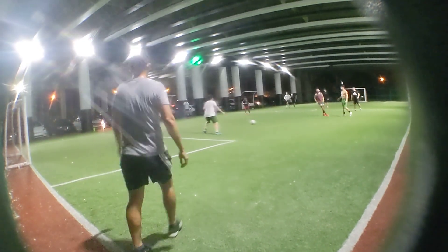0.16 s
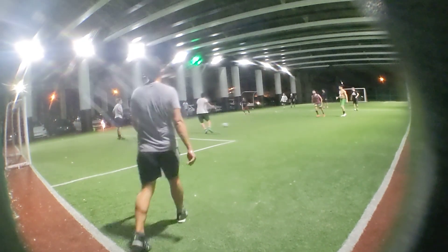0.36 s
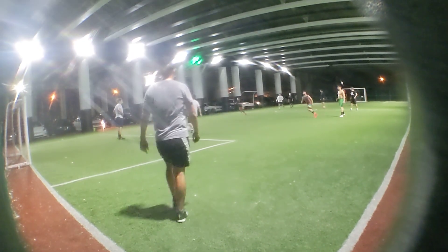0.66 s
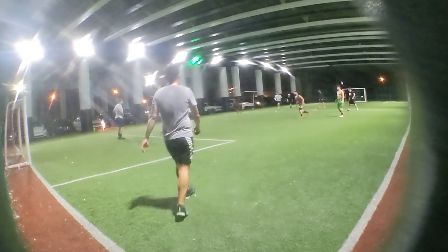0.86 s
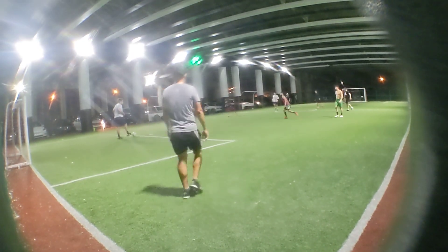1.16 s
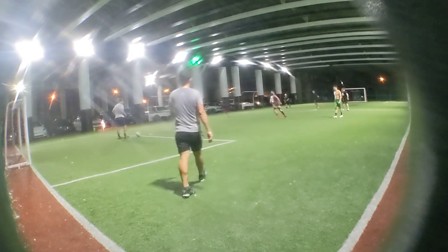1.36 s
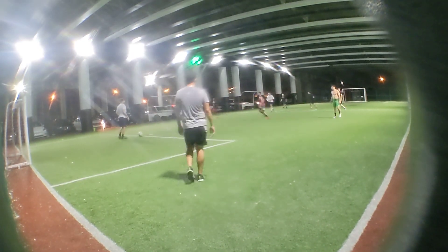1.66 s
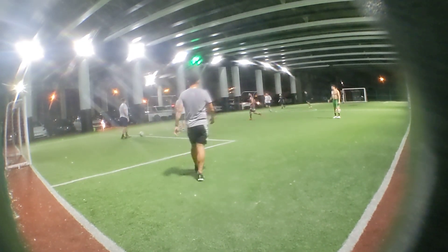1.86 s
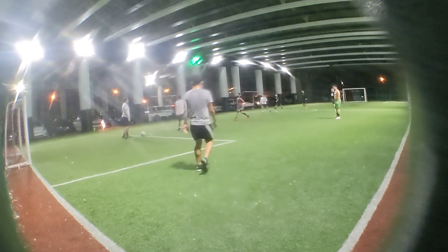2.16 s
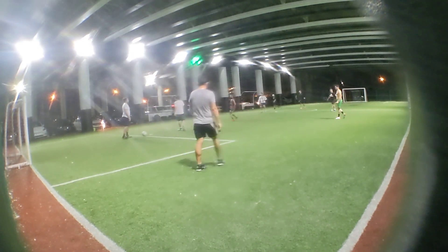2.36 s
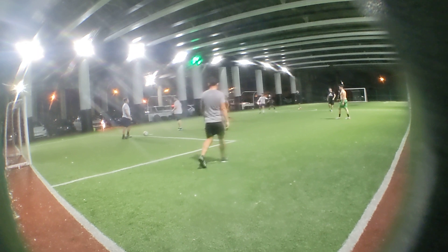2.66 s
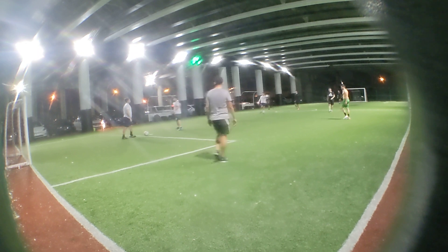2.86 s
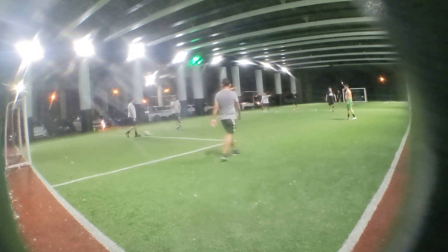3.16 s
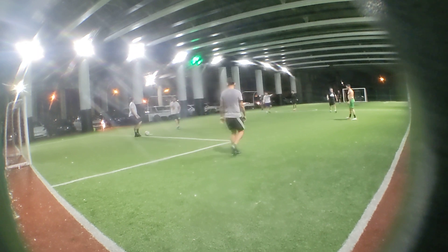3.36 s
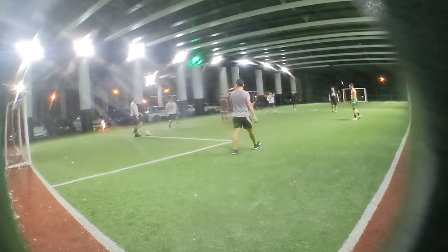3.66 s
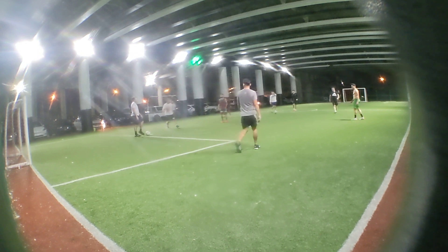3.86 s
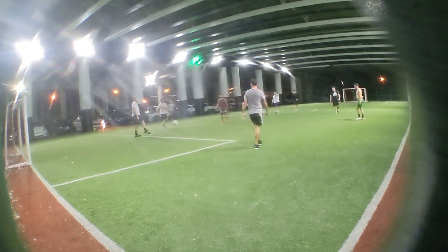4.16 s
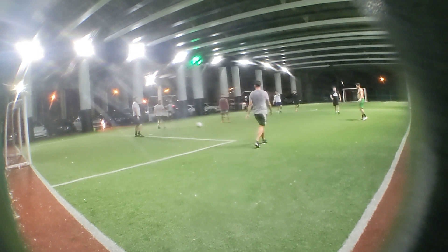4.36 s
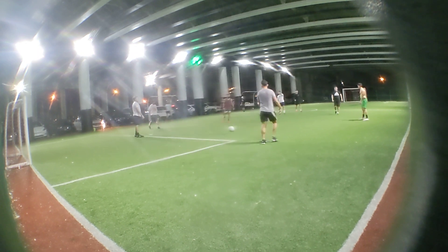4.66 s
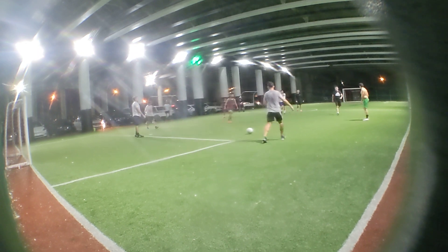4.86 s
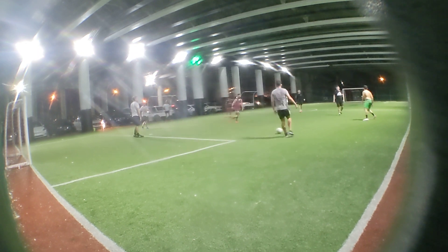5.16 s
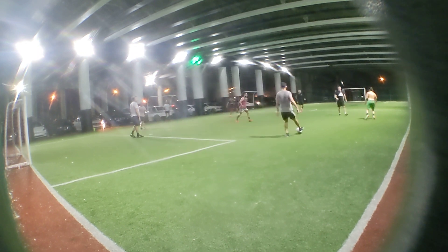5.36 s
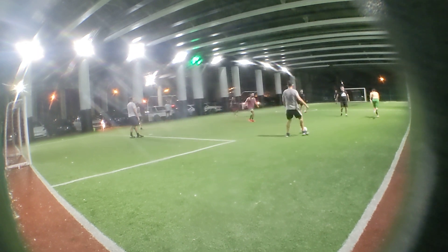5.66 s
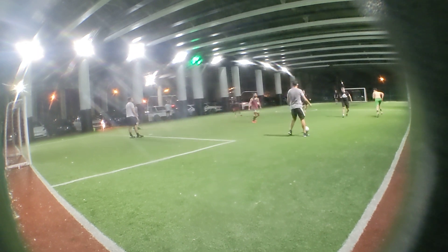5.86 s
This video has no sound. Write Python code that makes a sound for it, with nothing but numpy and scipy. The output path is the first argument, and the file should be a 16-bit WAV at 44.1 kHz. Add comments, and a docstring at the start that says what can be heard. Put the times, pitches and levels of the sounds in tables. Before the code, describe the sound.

Wide, low, boomy traffic noise from a bridge deck overhead, with a lumpy low engine drone that surges and fades. Close to a small stereo camera microphone, one rough rubbery scrape, then a few quiet grassy scuffs and crisp little clicks. Two near-joined distant thuds and later another single one sound dully. The rumble swells mid-way, then eases as faint car tyres hiss past.

```python
"""Traffic rumbles through the deck of a road viaduct, over a covered football pitch at night.
The place is heard by a small camera with two microphone ports, beside the goal. The rumble is shaped noise that
swells once as a vehicle crosses; a lighter car follows, heard only by its tyres. Engine notes are drifting tones
blurred by random echoes, and far knocks are short booms. Close by, a sole scrapes as ringing noise,
shoes scuff the turf as grainy noise, and small sharp ticks strike treble resonances."""
import sys
import numpy as np
from scipy import signal
from scipy.fft import rfft, irfft, next_fast_len
from scipy.io import wavfile
from scipy.ndimage import uniform_filter1d, map_coordinates

SR = 44100
rng = np.random.default_rng(int(sys.argv[2]) if len(sys.argv) > 2 else 0)


def dump_mix(stems):
    """Bounce the given channels to the path in sys.argv[1] as a 16-bit WAV at rate SR."""
    frames = np.atleast_2d(stems).T  # one column per channel
    limited = np.clip(frames, -1, 1)  # hard clip at full scale
    pcm = np.round(limited * 32767).astype(np.int16)
    wavfile.write(sys.argv[1], SR, pcm)


N = 265032  # length in samples
TOP_HZ = 15760  # the camera's band limit


def amp(db):
    """Decibels to gain."""
    return 10 ** (np.asarray(db) / 20)


def unit(x):
    """Scale to rms 1."""
    return x / np.sqrt(np.mean(x ** 2) + 1e-20)


def along(points, hz):
    """Read a curve of (Hz, value) points on a log frequency axis."""
    point_hz, values = np.transpose(points)
    return np.interp(np.log(hz + 1), np.log(point_hz + 1), values)


def clock():
    """The time of every sample in seconds."""
    return np.arange(N) / SR


def wobble(rate):
    """A smooth random curve with this many knots a second."""
    knots = rng.standard_normal(int(N * rate / SR) + 4)
    return map_coordinates(knots, [clock() * rate])


def swell(s, half):
    """A bell-shaped rise and fall around time s."""
    return np.exp(-.5 * ((clock() - s) / half) ** 2)


def filtered(x, response):
    """Multiply the spectrum of x by a response of frequency."""
    m = next_fast_len(N + 8192)
    spectrum = rfft(x, m) * response(np.fft.rfftfreq(m, 1 / SR))
    return irfft(spectrum, m)[..., :N]


def panned(pan_db):
    """Left and right gains for a left-minus-right level difference."""
    return amp([[pan_db / 2], [-pan_db / 2]])


def diffuse(spectrum, patchy_db):
    """Stereo noise of rms 1 arriving from all sides, with patches of random gain."""
    # How alike the two ports hear; long waves reach both alike.
    # Each row: frequency in Hz, left-right likeness (1 is identical, negative is opposed).
    alike = [(60, 0.96), (83, 0.95), (110, 0.97), (160, 0.97), (220, 0.94), (300, 0.91), (420, 0.62),
             (580, 0.63), (810, 0.21), (1120, -0.016), (1540, -0.28), (2140, -0.024), (2960, 0.02),
             (4090, -0.16), (5660, 0.0012), (7830, -0.092), (10800, -0.05), (15000, -0.04)]
    noise = signal.stft(rng.standard_normal((2, N)), nperseg=1024)[2]
    field = rng.standard_normal(noise.shape[1:])
    field = uniform_filter1d(field, size=8, axis=0)  # smooth over frequency
    field = uniform_filter1d(field, size=12, axis=1)  # smooth over time
    pair = signal.istft(noise * amp(patchy_db * unit(field)), nperseg=1024)[1][:, :N]

    def mid_side(hz):
        turn = np.arccos(np.clip(along(alike, hz), -1, 1)) / 2
        return amp(along(spectrum, hz)) * [np.cos(turn), np.sin(turn)]

    mid, side = filtered(pair, mid_side)
    return unit(np.array([mid + side, mid - side]))


def hum(hz, drift_hz, echo_db):
    """A drifting tone plus its many reflections, which beat with it in uneven lumps."""
    phase = 2 * np.pi * np.cumsum(hz + drift_hz * wobble(14)) / SR
    echoes = unit(wobble(19)) * np.sin(phase) + unit(wobble(23)) * np.cos(phase)
    return unit(np.sin(phase) + amp(echo_db) * echoes / np.sqrt(2))


def ringing(modes, stroke):
    """Rough contact as noise bands at the resonances (Hz, width Hz, dB), following the stroke's strength."""
    out = np.zeros((2, len(stroke)))
    for hz, width, db in modes:
        mode = signal.butter(2, [hz - width / 2, hz + width / 2], "bandpass", fs=SR, output="sos")
        # reversed, so the filter's quiet start falls at the end
        band = signal.sosfilt(mode, rng.standard_normal(out.shape))[:, ::-1]
        out += amp(db) * np.array([unit(stroke * port) for port in band])
    return unit(out) * np.sqrt(np.mean(stroke ** 2))


def distance_db(lag):
    """Level of the crossing vehicle against its closest moment: it falls as one over the distance."""
    closest_s, distance_m, speed_m_per_s = 2.39, 18.7, 16.8
    along_road = speed_m_per_s * (clock() - closest_s - lag)
    return 20 * np.log10(distance_m / np.hypot(distance_m, along_road))


def traffic():
    """The deck rumbles; bodies, tyre roar and hiss lie above it as diffuse noise, and all swell with the crossing."""
    # Spectra of the four layers. Each row: frequency in Hz, relative level in dB per Hz.
    deck_spectrum = [(12, -42.5), (30, -28), (48, -8.5), (65, -1), (90, -1.5), (122, 3), (150, -1.5),
                     (200, -11.5), (400, -48), (900, -120)]
    body_spectrum = [(40, -84), (100, -18), (150, -2.5), (185, 1), (225, -3.5), (255, -5.5), (305, -6),
                     (345, -10.5), (420, -17), (600, -27.5), (2500, -120)]
    tyre_spectrum = [(100, -69), (250, -21.5), (450, 2.5), (520, -1), (610, 1), (730, -3), (900, -2),
                     (1100, -7), (1500, -10), (2000, -15), (3000, -30.5), (9000, -100)]
    hiss_spectrum = [(300, -69), (900, -22), (1650, -3.5), (2550, 0), (3000, -4.5), (4000, -9.5),
                     (5500, -14), (7200, -17.5), (9000, -21.5), (10800, -28), (12000, -27.5), (13500, -31),
                     (15700, -30.5)]
    # level in dB at the closest moment, share of the distance loss that the layer follows
    deck_db, deck_follows = -23.5, 0.32
    body_db, body_follows = -22, 0.7
    # off the span; the hiss also follows distance, late because tyres throw it backwards
    tyre_db, tyre_span_db = -34, 3
    hiss_db, hiss_span_db, hiss_follows, hiss_lag_s = -45.5, 0.8, 0.054, 0.72
    span_on_s, span_off_s, span_ramp_s = 1.42, 3.96, 0.12  # the vehicle is on the span overhead

    def past(s):
        return .5 + .5 * np.tanh((clock() - s) / (2 * span_ramp_s))

    on_span = past(span_on_s) - past(span_off_s)
    deck_level = deck_db + deck_follows * distance_db(0)
    body_level = body_db + body_follows * distance_db(0)
    tyre_level = tyre_db + tyre_span_db * on_span
    hiss_level = hiss_db + hiss_span_db * on_span + hiss_follows * distance_db(hiss_lag_s)
    deck = amp(deck_level) * diffuse(deck_spectrum, patchy_db=0.5)
    body = amp(body_level) * diffuse(body_spectrum, patchy_db=0.26)
    tyres = amp(tyre_level) * diffuse(tyre_spectrum, patchy_db=0.94)
    hiss = amp(hiss_level) * diffuse(hiss_spectrum, patchy_db=0.9)
    return deck + body + tyres + hiss


def car():
    """The following lighter car's tyres swish by as a bell-shaped swell of noise in the middle treble."""
    # The swish's colour. Each row: frequency in Hz, relative level in dB per Hz.
    tyre_colour = [(500, -45), (1000, -12), (1400, 6.5), (2400, 2), (3500, -19.5), (8000, -60.5)]
    passing_s, half_s, peak_db = 4.88, 0.87, -46
    return amp(peak_db) * swell(passing_s, half_s) * diffuse(tyre_colour, patchy_db=-2.0)


def engines():
    """A heavy engine's drone wavers, surges and draws away; other notes come and go in the rumble."""
    # Surges of the heavy drone. Each row: centre in seconds, peak level in dB, half length in seconds.
    surge_rows = [(0.233, -17, 0.049), (0.896, -26, .025), (0.973, -23, 0.016), (1.147, -26, 0.023),
                  (1.469, -21, 0.018), (1.546, -23, .018), (2.183, -22.5, 0.043), (2.484, -19, 0.024),
                  (2.662, -30, 0.025), (2.8, -29, 0.03), (2.992, -28, 0.022), (3.755, -26, 0.031),
                  (4.337, -29, .06)]
    # Other engines' notes that swell briefly under the roof.
    # Each row: centre in seconds, frequency in Hz, peak level in dB, half length in seconds.
    hum_rows = [(0.364, 314.6, -28.5, 0.05), (1.2, 367.5, -43, 0.31), (1.24, 120.5, -25, 0.11),
                (3.424, 122.3, -24.5, 0.085), (3.46, 372, -36.5, .05), (4.66, 327, -35.5, 0.093),
                (5.13, 103.4, -31.5, 0.15), (5.56, 368.3, -35, 0.26)]
    # The roof's smeared answer to the drone. Each row: frequency in Hz, relative level in dB per Hz.
    echo_spectrum = [(120, -64.5), (148, -11), (160, 7.5), (172, -8.5), (210, -64.5)]
    drone_hz, drone_db, leaves_s, fade_db_per_s = 160.1, -29, 0.71, 2.16
    roof_db = -4.5  # the roof's answer against the drone
    whine_hz, whine_db = 370.6, -46.5  # a far, higher hum

    drone = amp(drone_db - fade_db_per_s * np.maximum(clock() - leaves_s, 0))
    surges = sum(amp(db) / (1 + ((clock() - s) / half) ** 6) for s, db, half in surge_rows)
    out = (drone + surges) * hum(drone_hz, drift_hz=3.78, echo_db=-10.5)
    out = out + amp(roof_db) * drone * diffuse(echo_spectrum, patchy_db=1.5)
    out += amp(whine_db) * hum(whine_hz, drift_hz=4.0, echo_db=8.0)
    for s, hz, db, half in hum_rows:
        out += amp(db) * swell(s, half) * hum(hz, drift_hz=.011 * hz, echo_db=-3)
    return out


def thuds(t60=0.33, attack=0.0061):
    """Each dull far knock is a short decaying boom, rounded by the roof's echoes; times in seconds."""
    # Each row: start in seconds, level in dB ahead of attack and decay, frequency in Hz.
    knocks = [(1.766, -14, 122), (1.824, -18.5, 105), (3.235, -13, 132)]
    out = np.zeros(N)
    for s, db, hz in knocks:
        age = np.maximum(clock() - s, 0)
        envelope = amp(db - 60 * age / t60) * (1 - np.exp(-age / attack))
        out += envelope * hum(hz, drift_hz=21.77, echo_db=-2.0)
    return out


def ticks(tail_db=-21, tail_t60=.06):
    """A tiny hard contact strikes a few broad treble resonances once; a faint scatter follows."""
    # Small near contacts. Each row: start in seconds, level in dB, brightness in dB per octave,
    # left minus right in dB at the ports, ahead of the right port's own colour.
    contacts = [(1.2594, -42.5, -1.5, -1), (1.2613, -46, -2, -7), (1.2775, -55, 4.5, 3), (1.661, -56, 4, 2),
                (1.7586, -45.5, 1, -9), (1.7603, -41, 1.5, -7.5), (1.7704, -46, -13, -9.5),
                (1.961, -52.5, 6.5, -5), (3.7415, -51, 0.5, -5), (3.745, -52, 0, -5), (5.454, -50, -2, -10)]
    # The resonances. Each row: frequency in Hz, width in Hz, level in dB ahead of the brightness.
    resonances = [(4960, 900, -3), (6240, 960, 0), (9000, 4500, -2), (13700, 2000, -3)]
    out = np.zeros((2, N + SR))
    t = np.arange(SR // 8) / SR
    for s, db, bright_db, pan_db in contacts:
        modes = [(hz, width, level + bright_db * np.log2(hz / 6000)) for hz, width, level in resonances]
        click = np.zeros(len(t))
        for hz, width, level in modes:
            age = np.pi * width * t  # in decay times
            click += amp(level) * age * np.exp(1 - age) * np.sin(2 * np.pi * (hz * t + rng.random()))
        scatter = ringing(modes, amp(tail_db - 60 * t / tail_t60))
        out[:, round(s * SR):][:, :len(t)] += amp(db) * panned(pan_db) * (click + scatter)
    return out[:, :N]


def scuffs(grain_db=4):
    """A sole brushes the plastic grass: a short swish of coloured noise with grainy random gain."""
    # Each row: centre in seconds, level in dB, half length in seconds, tilt in dB per octave,
    # left minus right in dB at the ports, ahead of the right port's own colour.
    strokes = [(0.372, -54, 0.022, 1.5, -3), (0.847, -62, .016, 15, 3.5), (1.285, -66.5, 0.018, 17.5, -0.5),
               (1.826, -55.5, 0.045, 3.5, -3), (1.967, -61, 0.026, 13, 0.5), (3.742, -49.5, .003, 3.5, -4),
               (4.037, -52, .012, -0.5, -0.5)]
    # The turf's colour ahead of the tilt. Each row: frequency in Hz, relative level in dB per Hz.
    turf = [(1000, -33), (2100, -4.5), (2700, 0.5), (3500, -4), (5200, -4), (7000, -4), (9000, -13),
            (10500, -15), (15700, -23)]
    out = np.zeros((2, N))
    for s, db, half, tilt_db, pan_db in strokes:
        def colour(hz):
            tilt = tilt_db * np.log2(hz / 5000 + 0.0013)  # the offset keeps 0 Hz finite
            return amp(along(turf, hz) + tilt) * (hz < TOP_HZ)

        stroke = swell(s, half)
        brush = filtered(rng.standard_normal((2, N)), colour)
        swish = stroke * brush * amp(grain_db * wobble(690))
        out += amp(db) * panned(pan_db) * unit(swish) * np.sqrt(np.mean(stroke ** 2))
    return out


def scrape(grain_db=3.0):
    """A rubber sole catches and scrapes: a brief, rough stroke of noise in its few narrow resonances."""
    # The sole's resonances. Each row: frequency in Hz, width in Hz, relative level in dB.
    sole = [(1900, 550, -3), (2660, 330, 6.5), (3900, 1200, -1), (5300, 1100, -5.5), (6400, 1100, -12),
            (8830, 350, -14)]
    centre_s, half_s = 0.375, 0.0048
    level_db, pan_db = -36.5, 3.5
    stroke = swell(centre_s, half_s) * unit(amp(grain_db * wobble(600)))
    return amp(level_db) * panned(pan_db) * ringing(sole, stroke)


def scene():
    """Near sounds lie on top of the far field; the right port adds its own colour, which rings in the treble."""
    # Each row: frequency in Hz, gain of the right port against the left in dB.
    right_port = [(60, 0.5), (700, 0.95), (3000, 0.53), (4000, 2), (5000, 3), (6000, 7), (6800, 6),
                  (8000, 0.5), (10000, -2), (11500, 0), (12800, 3.5), (15000, 1.5)]
    far = traffic() + car() + engines() + thuds()
    near = ticks() + scuffs() + scrape()
    left, right = far + near
    return np.array([left, filtered(right, lambda hz: amp(along(right_port, hz)))])


def record(dry):
    """The camera keeps nothing above its band limit."""
    return filtered(dry, lambda hz: hz < TOP_HZ)


dry = scene()
out = record(dry)
dump_mix(out)
```